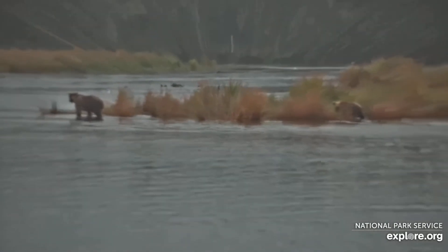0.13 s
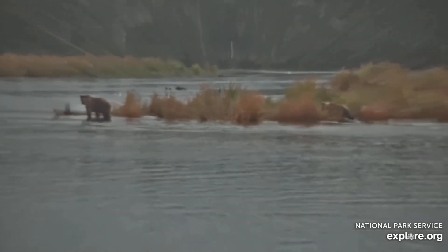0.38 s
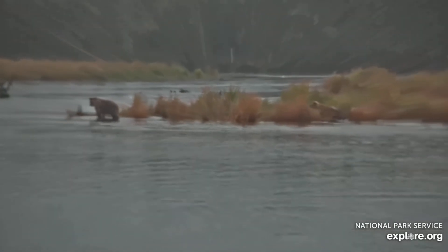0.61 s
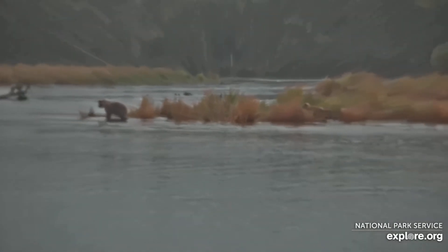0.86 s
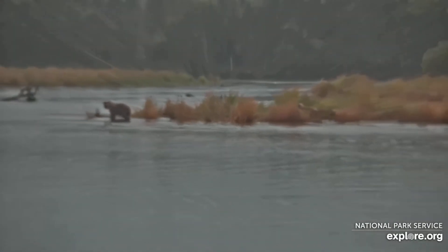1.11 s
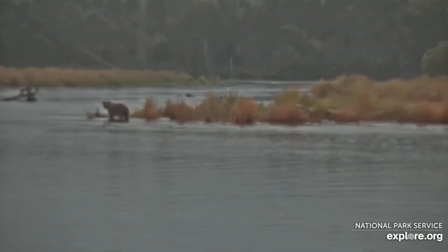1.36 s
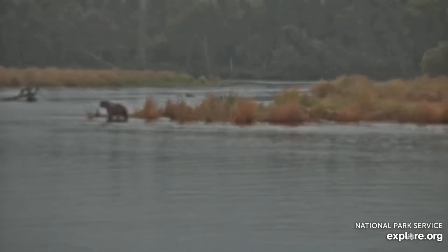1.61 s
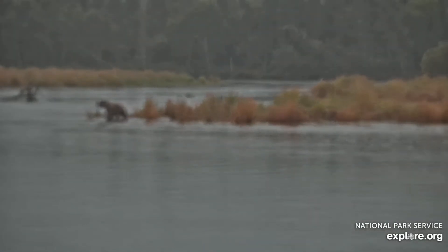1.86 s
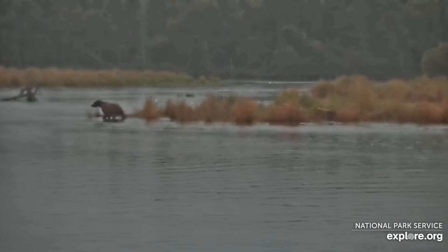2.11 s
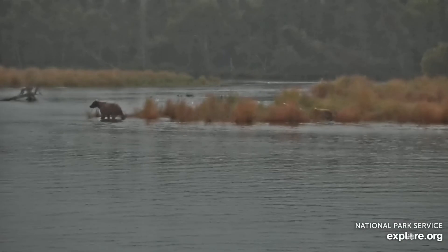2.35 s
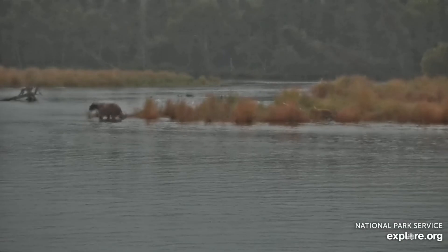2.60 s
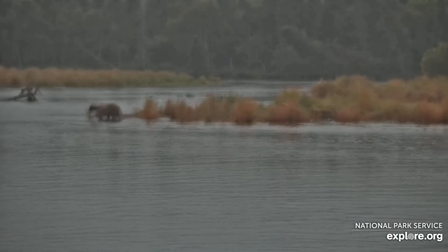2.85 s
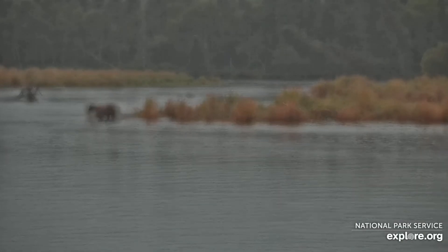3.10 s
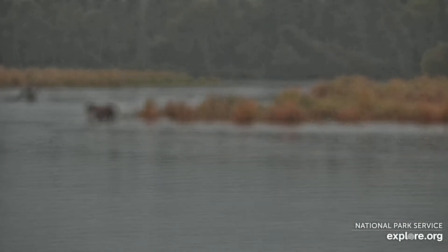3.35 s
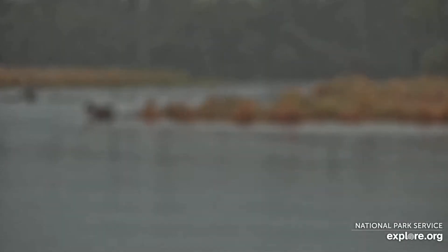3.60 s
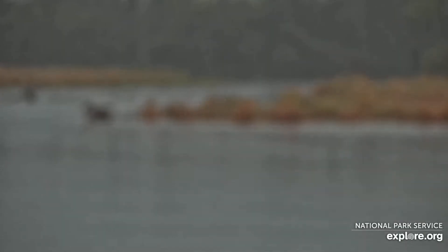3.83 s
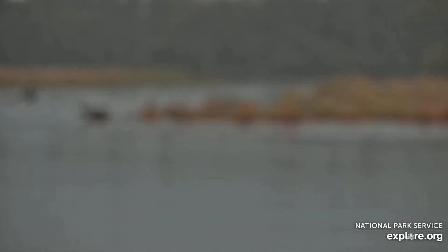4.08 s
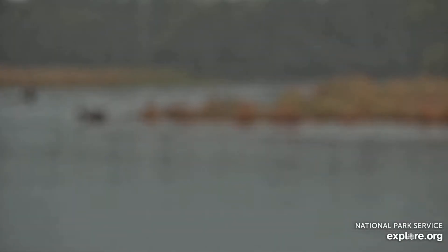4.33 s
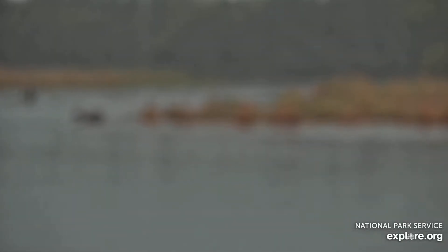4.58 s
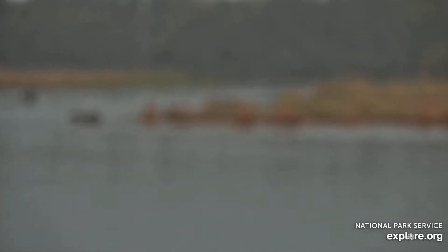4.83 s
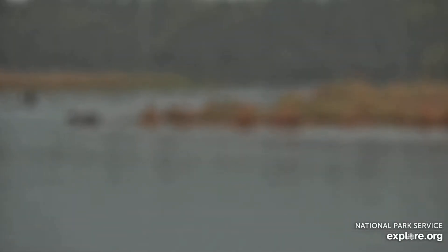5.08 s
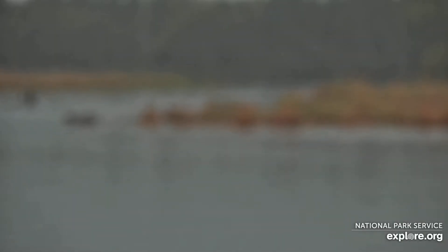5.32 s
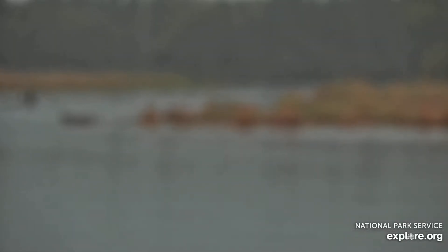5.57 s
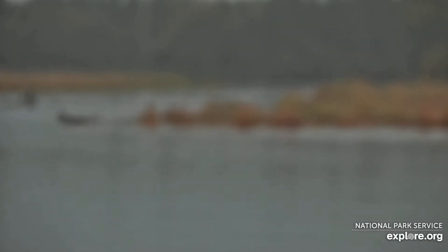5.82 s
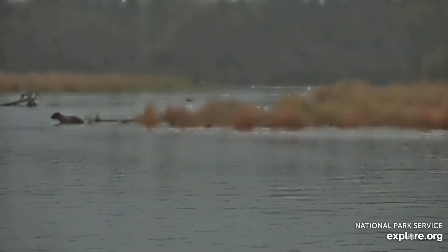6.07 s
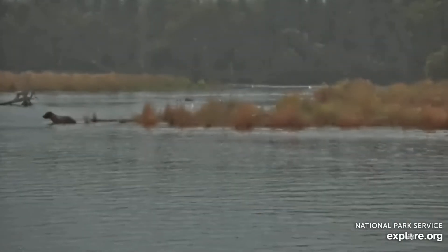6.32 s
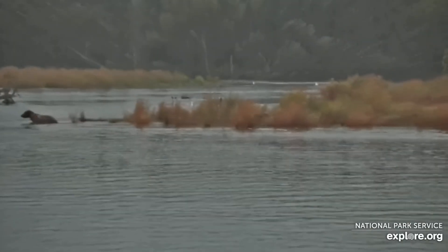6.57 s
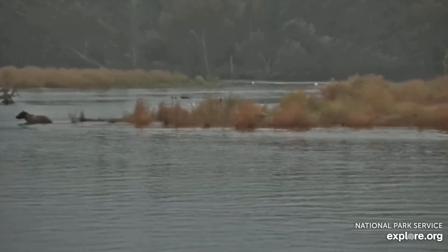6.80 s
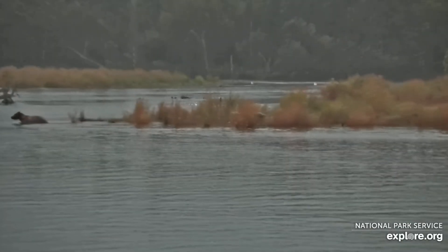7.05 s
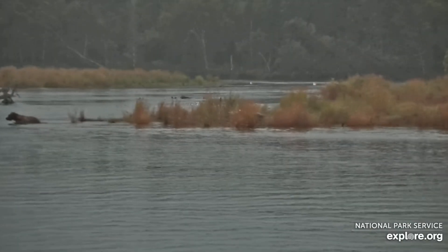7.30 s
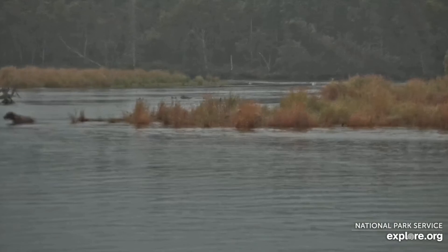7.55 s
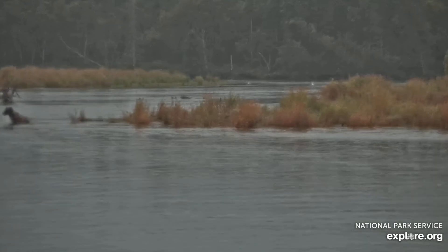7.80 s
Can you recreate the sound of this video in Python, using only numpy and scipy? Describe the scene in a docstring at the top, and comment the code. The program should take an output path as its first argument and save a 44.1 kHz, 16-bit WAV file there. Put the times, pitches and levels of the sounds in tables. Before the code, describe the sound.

A wide river rushes steadily, low and soft, with slight hollow tones and a very faint high electronic whine. From the start a wader repeats a short two-note whistle about every 0.2 seconds, a level note near 2.6 kHz then a quick downward slide, strongest around 1-2.8 s, with faint bank echoes. Thin high seeps sound at 0.2 and 0.9 s, with tiny chips scattered throughout. Soft airy wingbeats flutter from 1.4 to 2.5 s. At 2.9 s a sharp, dry snap, by far the loudest event, cracks close by with tiny reflections. Low wind bumps nudge the microphone around 0.5, 4.6, 5.9 and 6.8 s. Clearer whistling wingbeats, about five per second, pass from 4.8 to 6.2 s. Faint distant wails rise at 4.9 and 6.5 s; a clear falling peep comes at 6.7 s, another barely starts at 7.1 s, then everything cuts to silence.

```python
"""A wader repeats a two-note call, which a bank throws back, over the broad rush of a wide river.
Whistled tones make the wader and the other small birds; shaped noise makes the river.
Wings whistle by twice as moving bands of noise and feather tones; a filtered click is a snap close by.
Slow swings are wind bumping the microphone, and narrow noise is the thin whine of the electronics.
The treble differs between the channels in brief patches, and the sound stops short."""
import sys
import numpy as np
from scipy import signal
from scipy.fft import irfft
from scipy.io import wavfile
from scipy.ndimage import uniform_filter1d

SR = 44100
rng = np.random.default_rng(int(sys.argv[2]) if len(sys.argv) > 2 else 0)


def master_out(mix):
    """Clip the mix to full scale and print it as 16-bit PCM to the path in sys.argv[1]."""
    frames = np.transpose(np.atleast_2d(mix))
    ceiling = np.clip(frames, -1, 1)
    pcm = np.round(ceiling * 32767).astype(np.int16)
    wavfile.write(sys.argv[1], SR, pcm)


def nominal_scale(level):
    """Amplitude ratio for a level in decibels (scalar or array-like)."""
    x = np.asarray(level, float) / 20
    return 10 ** x


N = 349256
STOP_S = 7.136  # everything falls silent here


def evened(x):
    """Scales to rms 1."""
    return x / np.sqrt(np.mean(x ** 2) + 1e-20)


def read(points, hz):
    """Reads a spectrum on a log-frequency axis."""
    f, value = np.transpose(points)
    return np.interp(np.log(hz + 1), np.log(f + 1), value)


def add(mix, s, sound):
    """Mixes a sound in at time s."""
    part = mix[round(s * SR):][:len(sound)]
    part += sound[:len(part)]


def resonate(x, hz, width_hz):
    """A resonance that can glide: shifts the curve hz down to zero, smooths, and shifts back."""
    turn = np.exp(2j * np.pi * np.cumsum(hz * np.ones(len(x))) / SR)
    r = np.exp(-np.pi * width_hz / SR)
    smooth = signal.lfilter([1 - r], [1, -r], x / turn)
    return 2 * (turn * smooth).real


def band(n, hz, width_hz):
    """Noise through the same resonance twice, at rms 1."""
    once = resonate(rng.standard_normal(n), hz, width_hz)
    return evened(resonate(once, hz, width_hz))


def whistle(hz, db, edge=0.48, waver=0.18):
    """A near sine whose strength wavers as the air on its path stirs; edge is the faded share."""
    stir = evened(uniform_filter1d(rng.standard_normal(len(hz)), size=250))
    tone = np.sin(2 * np.pi * (np.cumsum(hz) / SR + rng.random()))
    fades = signal.windows.tukey(len(hz), np.clip(edge, 0, 1))
    return nominal_scale(db) * (1 + waver * stir) * tone * fades


def electronics_whine():
    """Narrow bands of noise close together make one thin, high whine."""
    # Each row: centre in Hz, width of each resonance in Hz, level in dB rms.
    whine_bands = [(11827, 3, -76.5), (11887, 12, -80.5), (11850, 90, -76)]
    return sum(nominal_scale(db) * band(N, hz, width) for hz, width, db in whine_bands)


def spread(per_s=7, spread_db=-62):
    """Now and then a patch of treble differs between the channels for a moment."""
    out, window = np.zeros(N), np.hanning(2048)
    for when, where in rng.random((round(per_s * STOP_S), 2)):
        hz = 4600 * 3.6 ** (where ** 2)
        patch = band(4096, hz, 0.085 * hz)[2048:] * window  # skips the build-up of the resonance
        add(out, when * (STOP_S - .1), nominal_scale(spread_db - 8.5 * where) * patch)
    return out


def river(patchy_db=0.64, flicker_db=.5, rush_db=-42):
    """Random short-time spectra with drifting patches turn slowly in colour; hollow notes lie within."""
    # Each row: frequency in Hz, relative level in dB at first, relative level in dB at last.
    rush_colour = [(20, -17.5, -12), (70.3, -17, -21), (99, -29, -15.5), (154, -5.5, -10), (253, 0, 0.5),
                   (370, -3, -3), (658, -3.5, -8.5), (820, -12.5, -14), (950, -12.5, -16),
                   (1463, -16.5, -16.5), (1976, -18.5, -20.5), (2500, -18, -19), (3300, -22, -23.5),
                   (4500, -24, -24.5), (9170, -29, -30), (10100, -33, -33), (11800, -32, -32.5),
                   (15600, -36, -37)]
    # Hollow notes in the rush. Each row: centre in Hz, width of each resonance in Hz, level in dB rms.
    hollow_notes = [(279, 20, -56), (160, 25, -60), (1152, 12, -68.5)]
    frames, hz = N // 256 + 5, np.fft.rfftfreq(1024, 1 / SR)
    a, b, patches = rng.standard_normal((frames, 513, 3)).T
    patches = uniform_filter1d(patches, size=12, axis=0)  # across frequency
    patches = evened(uniform_filter1d(patches, size=14, axis=1))  # across time
    flicker = evened(uniform_filter1d(rng.standard_normal(frames), size=8))
    first, last = (read(np.array(rush_colour)[:, [0, k]], hz)[:, None] for k in (1, 2))
    late = np.clip((np.arange(frames) * 256 / SR - .8) / 4.5, 0, 1)
    colour_db = first + late * (last - first)
    spectra = (a + 1j * b) * nominal_scale(colour_db + patchy_db * patches + flicker_db * flicker)
    noise = signal.istft(spectra, nperseg=1024, noverlap=768)[1][:N]
    hollows = sum(nominal_scale(db) * band(N, f, width) for f, width, db in hollow_notes)
    return nominal_scale(rush_db) * evened(noise) + hollows


def wind():
    """Each gust pushes the membrane through one or two slow swings."""
    # Each row: centre in seconds, peak in dB, swing rate in Hz, reach to either side in seconds.
    wind_bumps = [(0.475, -41, 41.4, 0.14), (0.644, -48, 35, .1), (1.353, -53, 35, .1), (3.78, -56, 40, .1),
                  (4.532, -38, 34.4, 0.078), (4.696, -31.5, 48, 0.05), (5.871, -35.5, 45.3, 0.09),
                  (6.787, -44.5, 43.3, 0.098), (7.076, -45.5, 60, .1)]
    out = np.zeros(N)
    for s, db, hz, reach in wind_bumps:
        t = np.arange(-reach, reach, 1 / SR)
        swell = np.exp(-(4 * t / reach) ** 2)
        add(out, s - reach, -nominal_scale(db) * np.cos(2 * np.pi * hz * t) * swell)
    return out


def snap(scatter_db=-47, scatter_t60=0.18):
    """A click about a millisecond long, three reflections and a brief scatter, all in one colour."""
    # The snap, then its reflections. Each row: time in seconds, peak in dB.
    snap_hits = [(2.8767, -11.5), (2.8907, -21), (2.893, -24.5), (2.914, -30.5)]
    # Colour of the click. Each row: frequency in Hz, relative level in dB.
    click_colour = [(250, -23), (750, -1.5), (1900, 1.5), (3500, -6), (5000, -4.5), (6300, -10.5),
                    (7200, -37.5), (9000, -55)]
    colour = nominal_scale(read(click_colour, np.fft.rfftfreq(512, 1 / SR)))
    click = np.roll(irfft(colour * np.exp(.5j)), shift=256)  # the turned phase makes it lopsided
    hits, t = np.zeros(N), np.arange(SR // 10) / SR
    scatter = nominal_scale(scatter_db - 60 * t / scatter_t60) * rng.standard_normal(len(t))
    add(hits, snap_hits[1][0], scatter)  # sets in with the first reflection
    for s, db in snap_hits:
        hits[round(s * SR)] += nominal_scale(db)
    return signal.oaconvolve(hits, click / click.max())[256:256 + N]


def wings(stroke=.13):
    """As the wing speeds up the rush of air climbs, feathers start to whistle and hiss breaks out late."""
    # Each row: time nine tenths through the stroke in seconds, air rush in dB, air rush near mid-stroke
    # in Hz, feather whistle in dB at its strongest, hiss in dB.
    wing_beats = [(1.50, -54.5, 3000, -67, -60.5), (1.702, -52.5, 3180, -60.5, -58),
                  (1.901, -50, 3100, -51, -58), (2.092, -51.5, 3030, -60, -66), (2.31, -53, 2880, -52, -60),
                  (2.534, -48.5, 2300, -48, -48.5), (4.926, -47.5, 2760, -49, -62),
                  (5.109, -43, 2930, -41, -57), (5.292, -43, 2930, -38, -52.5),
                  (5.489, -43.5, 2900, -40, -50), (5.696, -43.5, 2750, -39, -58),
                  (5.918, -44, 2680, -41, -57), (6.14, -49, 2400, -54, -56)]
    out, u = np.zeros(N), np.linspace(0, 1, round(stroke * SR))
    hz = np.interp(u, [.2, .5, .68, .87, 1], [1700, 1950, 2300, 2880, 2820])  # feather pitch
    start = np.clip((u - .3) / 0.25, 0, 1)
    for s, rush_db, rush_hz, whistle_db, hiss_db in wing_beats:
        climb = rush_hz * (1 + 0.52 * (u - .48))
        core = band(len(u), climb, 740) + nominal_scale(-3.5) * band(len(u), .9 * climb, 1200)
        rush = nominal_scale(rush_db) * evened(core) * np.exp(-((u - .49) / 0.29) ** 4)
        swell_db = whistle_db - 19 * abs(u - .87)
        feather = whistle(hz, swell_db, edge=0.204, waver=0.38)
        breath = nominal_scale(swell_db - 8.5) * band(len(u), hz, 250)
        lower_feather = nominal_scale(swell_db - 11) * band(len(u), .72 * hz, 149)
        feathers = start * (feather + breath + lower_feather) * signal.windows.tukey(len(u), .2)
        hiss = nominal_scale(hiss_db) * band(len(u), 2300 + 3200 * u, 1400) * np.exp(-((u - .74) / .22) ** 2)
        add(out, s - .9 * stroke, rush + feathers + hiss)
    return out


def sing(out, s, hz, db, edge):
    """One small bird's note, a wavering whistle from time s."""
    add(out, s, whistle(hz, db, edge=edge, waver=0.33))


def seeps(lead_s=.03, trail_s=.035, bend_hz=800, fade_db=-9):
    """Thin two-voiced calls that dip and rise, strongest at the dip."""
    # Each row: time of the dip in seconds, upper voice in Hz and in dB, lower voice in Hz and in dB.
    seep_calls = [(.225, 8000, -55, 6740, -54), (.94, 7350, -54, 6570, -55.5)]
    out, t = np.zeros(N), np.arange(-lead_s, trail_s, 1 / SR)
    bend = np.where(t < 0, t / lead_s, t / trail_s) ** 2
    for s, upper_hz, upper_db, lower_hz, lower_db in seep_calls:
        for hz, db in [(upper_hz, upper_db), (lower_hz, lower_db)]:
            sing(out, s - lead_s, hz + bend_hz * bend, db + fade_db * bend, edge=.05)
    return out


def chips():
    """Short notes whose pitch runs in a straight line."""
    # Each row: start in seconds, length in seconds, first pitch in Hz, last pitch in Hz, level in dB.
    chip_notes = [(.26, .04, 8400, 8300, -63), (.36, .025, 7150, 7220, -60), (2.084, .03, 2820, 2870, -46),
                  (2.089, 0.025, 5000, 4950, -55), (3.893, .03, 5350, 4350, -55),
                  (4.237, 0.013, 4260, 3000, -54), (4.282, .012, 3300, 2880, -51),
                  (4.39, .022, 3840, 3850, -57), (4.712, .015, 3000, 2730, -52),
                  (5.79, .02, 3960, 3910, -59), (6.49, .04, 6100, 7150, -56)]
    out = np.zeros(N)
    for s, length, from_hz, to_hz, db in chip_notes:
        sing(out, s, np.linspace(from_hz, to_hz, round(length * SR)), db, edge=.3)
    return out


def peeps(jump_hz=1150, jump_s=.006, sag_hz=110, fade_db=-14.5):
    """Notes that jump up to their pitch, then sag and fade."""
    # Each row: start in seconds, length in seconds, pitch aimed at in Hz, level in dB before the fade.
    peep_notes = [(6.702, .122, 3990, -42), (7.12, 0.13, 4000, -39.5)]
    out = np.zeros(N)
    for s, length, hz, db in peep_notes:
        t = np.arange(0, length, 1 / SR)
        pitch = hz - jump_hz * np.exp(-t / jump_s) - sag_hz * t / length
        sing(out, s, pitch, db + fade_db * np.sqrt(t / length), edge=.12)
    return out


def wails(top_at=.68, fade_db=-5):
    """Long faint whistles from far off that rise and bend over."""
    # Each row: start in seconds, length in seconds, top pitch in Hz, level at the top in dB, rise in Hz.
    wail_notes = [(4.88, .6, 1564, -57, 110), (6.451, .51, 1582, -56, 65.1)]
    out = np.zeros(N)
    for s, length, hz, db, rise_hz in wail_notes:
        bend = (np.arange(0, length, 1 / SR) / length / top_at - 1) ** 2
        sing(out, s, hz - rise_hz * bend, db + fade_db * bend, edge=0.32)
    return out


def small_birds():
    """Four kinds of note, each with its own shape of pitch and level."""
    return seeps() + chips() + peeps() + wails()


def level_note(hz, db, length=0.04, sag_hz=45):
    """The wader's first note swells softly and sags only a little, from sag_hz above to sag_hz below."""
    return whistle(hz + np.linspace(sag_hz, -sag_hz, round(length * SR)), db, edge=0.64, waver=0.38)


def waders(slide=0.057, under_db=-11, top_hz=3000, foot_hz=2126, fall_bend=1.2, echo_fall_db=-4.5):
    """A level note, then one sliding down with a weak octave below; a bank returns a fainter copy."""
    # Each row: time in seconds 4 ms after the level note sets in, its level in dB, delay of the falling
    # note in seconds, level of that note in dB near its top, level in dB near its foot.
    wader_calls = [(0.079, -38, .032, -57, -50), (0.282, -44, .029, -53, -57),
                   (0.498, -43.5, .02, -56, -54.5), (0.694, -43.5, 0.034, -50, -57.5),
                   (0.898, -41, .032, -41, -46), (1.106, -35, 0.029, -38.5, -46),
                   (1.309, -36.5, 0.027, -41, -48), (1.517, -38, 0.036, -44.5, -45),
                   (1.728, -42.5, 0.029, -48.5, -43.5), (1.945, -37, 0.029, -45, -48),
                   (2.146, -40.5, .028, -49, -48.5), (2.344, -39.5, 0.04, -49.5, -54),
                   (2.543, -38.5, 0.037, -50, -48.5), (2.751, -40, .03, -44, -44),
                   (2.965, -41, 0.024, -50, -44), (3.183, -53, 0.025, -51, -47),
                   (3.401, -45, 0.024, -64, -45), (3.618, -47.5, .03, -60.5, -47.5),
                   (3.828, -46.5, 0.032, -53, -51), (4.039, -42, .028, -51.5, -54),
                   (4.25, -40.5, 0.031, -46, -46.5), (4.465, -39, .033, -48, -50),
                   (4.674, -45, .033, -54.5, -59), (4.894, -46, .024, -69, -70),
                   (5.085, -49, 0.023, -62.5, -52), (5.285, -45, 0.035, -65, -47.5),
                   (5.506, -46, 0.04, -51, -48), (5.723, -49, 0.036, -50, -49.5),
                   (5.943, -41, .026, -49, -48.5), (6.162, -47, 0.023, -47, -49.5),
                   (6.372, -42, 0.035, -48, -51), (6.593, -41.5, .028, -52, -58),
                   (6.81, -41, 0.036, -62, -57), (7.025, -38, .036, -52, -51.5)]
    # Pitch of the level note. Each row: time in seconds, pitch in Hz.
    call_pitch = [(0.1, 2646), (0.5, 2650), (1.2, 2690), (1.55, 2634), (2.15, 2710), (2.5, 2694),
                  (2.75, 2610), (3.2, 2640), (4.1, 2660), (4.6, 2660), (5.0, 2700), (5.3, 2640),
                  (6.1, 2615), (6.4, 2653), (7.0, 2618)]
    # Return from the bank as the bird moves. Each row: time in seconds, delay in seconds,
    # level in dB relative to the call.
    bank_echo = [(0.7, 0.086, -22), (1.1, 0.083, -24.5), (1.4, 0.071, -17.5), (1.75, 0.083, -9),
                 (2.0, .074, -11.5), (2.35, 0.055, -8), (2.55, 0.075, -9), (2.75, .09, -10.5),
                 (3.0, .077, -16.5), (3.3, 0.068, -5), (3.7, 0.071, -17), (4.05, 0.14, -22), (4.3, .15, -7),
                 (4.5, .146, -9.5), (4.8, .14, -22.5), (5.5, 0.043, -19), (5.75, 0.039, -5),
                 (6.3, .04, -18), (6.85, .04, -10.5)]
    out, u = np.zeros(N), np.linspace(0, 1, round(slide * SR))
    fall_hz = foot_hz + (top_hz - foot_hz) * (1 - u) ** fall_bend
    at, lag, loss_db = np.transpose(bank_echo)
    for s, db, delay, top_db, foot_db in wader_calls:
        hz = np.interp(s, *np.transpose(call_pitch))
        fall_db = np.interp(u, [.25, .75], [top_db, foot_db])
        echo_s, echo_db = np.interp(s, at, lag), np.interp(s, at, loss_db)
        # the call itself, then its echo, whose falling note is weakened further
        for late, note_db, slide_db in [(0, 0, 0), (echo_s, echo_db, echo_db + echo_fall_db)]:
            add(out, s + late - .004, level_note(hz, db + note_db))
            fall = whistle(fall_hz, fall_db + slide_db, edge=0.46, waver=0.4)
            octave_below = whistle(fall_hz / 2, fall_db + slide_db + under_db)
            add(out, s + late + delay, fall + octave_below)
    return out


def banks(x, t60=0.33, tail_db=-9.0):
    """A thin scatter from the banks and trees draws each note out."""
    t = np.arange(SR // 2) / SR
    tail = rng.standard_normal(len(t)) * nominal_scale(-60 * t / t60) * (t > .012)
    taps = nominal_scale(tail_db) * tail / np.linalg.norm(tail)
    taps[0] = 1  # the direct sound
    return signal.fftconvolve(x, taps)[:N]


def scene():
    """One microphone feeds both channels."""
    mono = river() + wind() + snap() + banks(wings() + small_birds() + waders())
    return np.array([mono, mono])


def band_limit(x):
    """A steep low-pass at the top of the band."""
    return signal.sosfilt(signal.butter(12, 16850, fs=SR, output="sos"), x)


def record(dry, edge_hz=15650):
    """Adds the whine and the channel differences, stops the sound short and limits the band."""
    apart = spread()
    sound = dry + electronics_whine() + np.array([apart, -apart])
    running = np.clip((STOP_S - np.arange(N) / SR) / 0.00059, 0, 1)  # closes within a millisecond
    limit = signal.firwin(511, edge_hz, window=("kaiser", 9), fs=SR)
    mix = signal.oaconvolve(sound * running, limit[None], "same")
    return band_limit(mix)


dry = scene()
out = record(dry)
master_out(out)
```